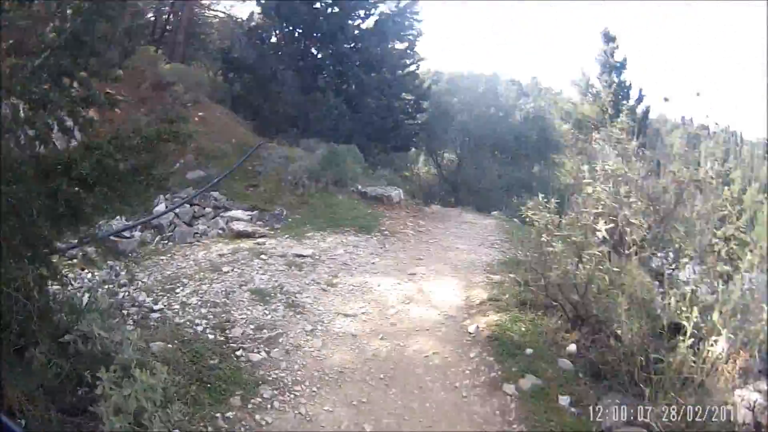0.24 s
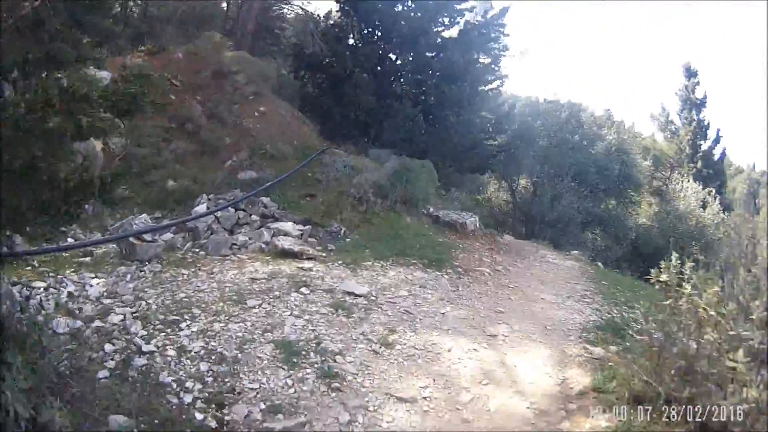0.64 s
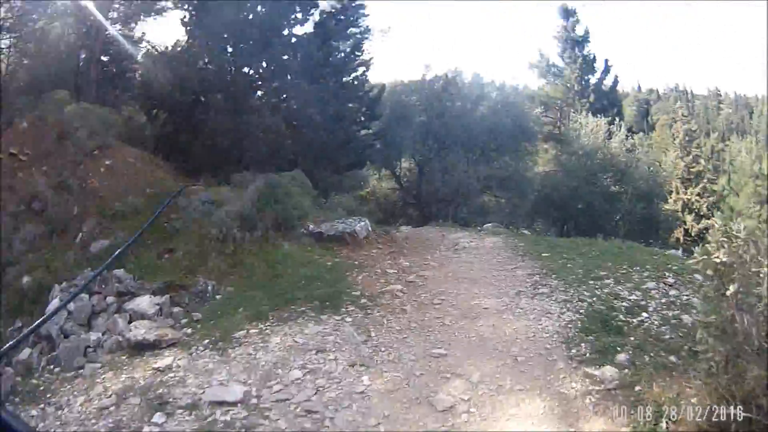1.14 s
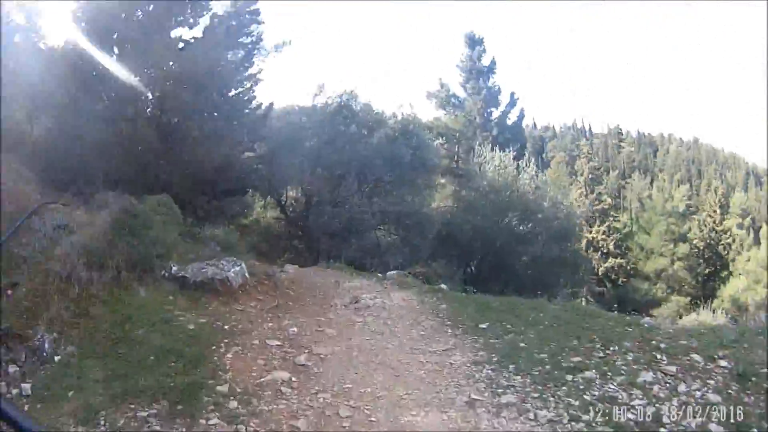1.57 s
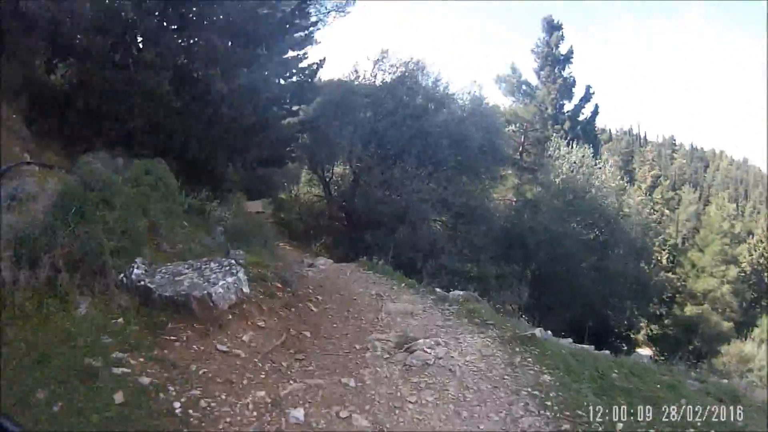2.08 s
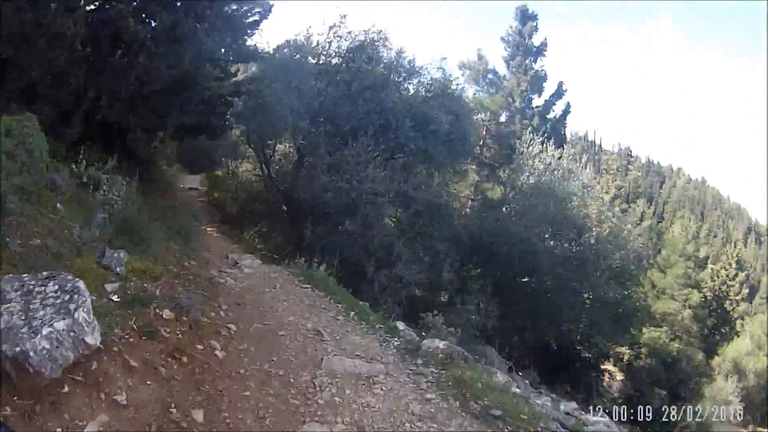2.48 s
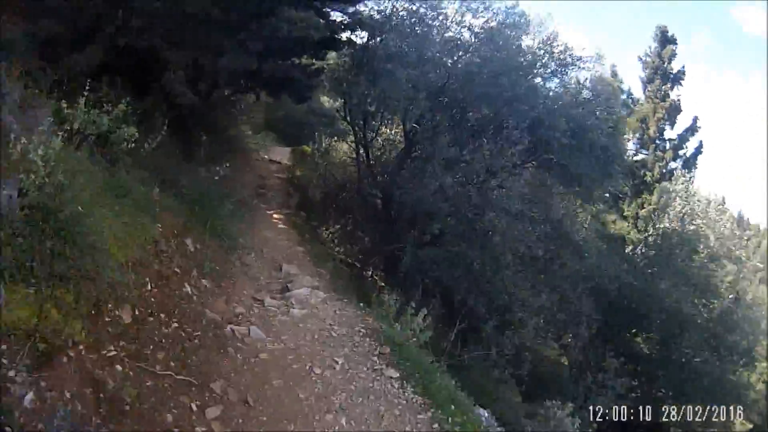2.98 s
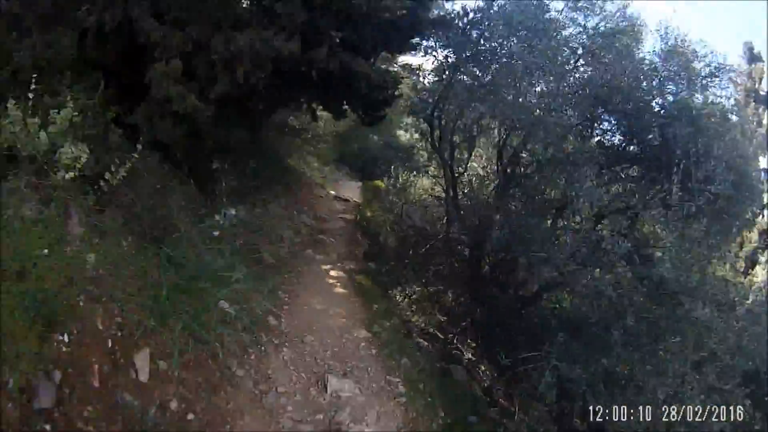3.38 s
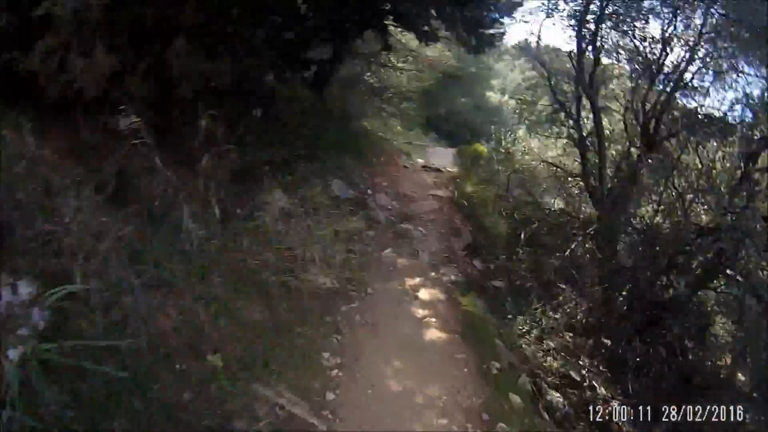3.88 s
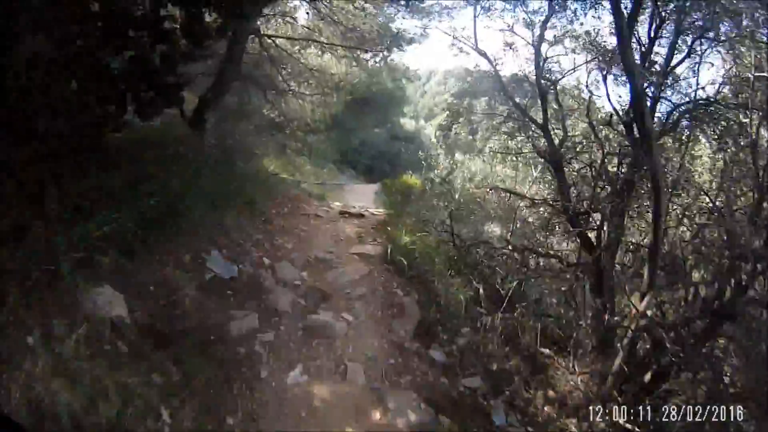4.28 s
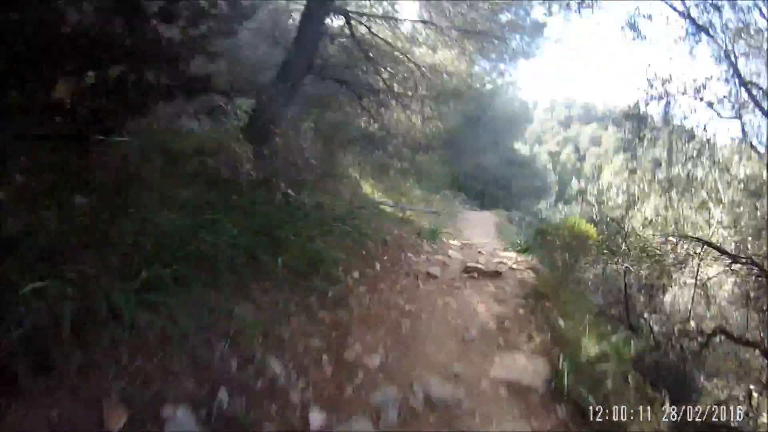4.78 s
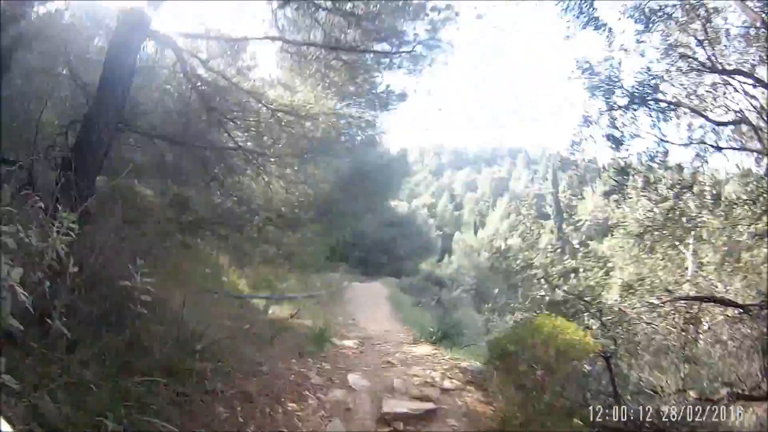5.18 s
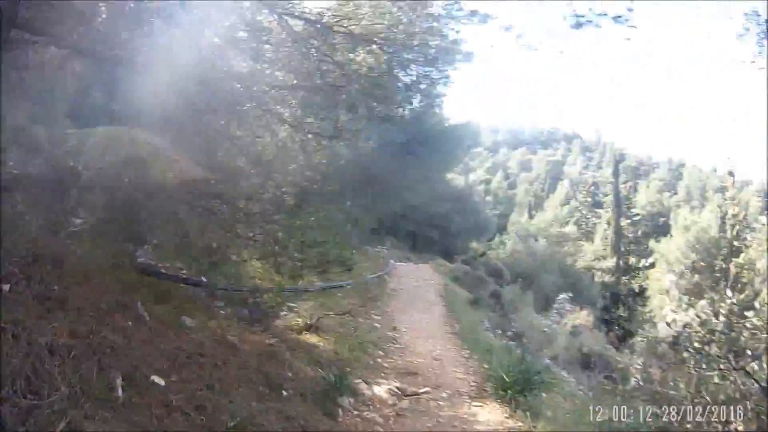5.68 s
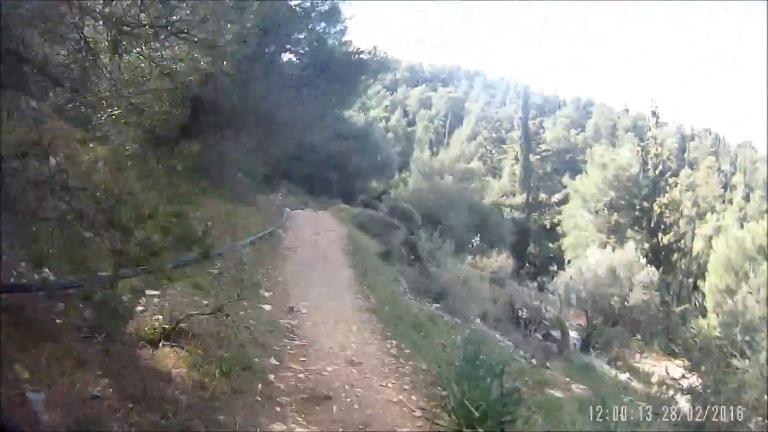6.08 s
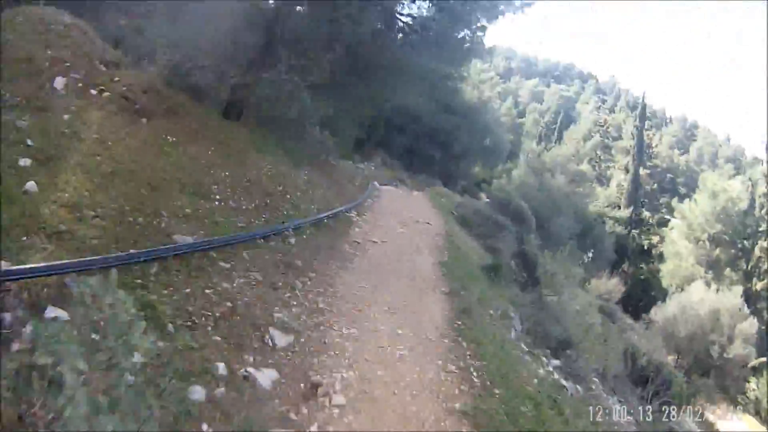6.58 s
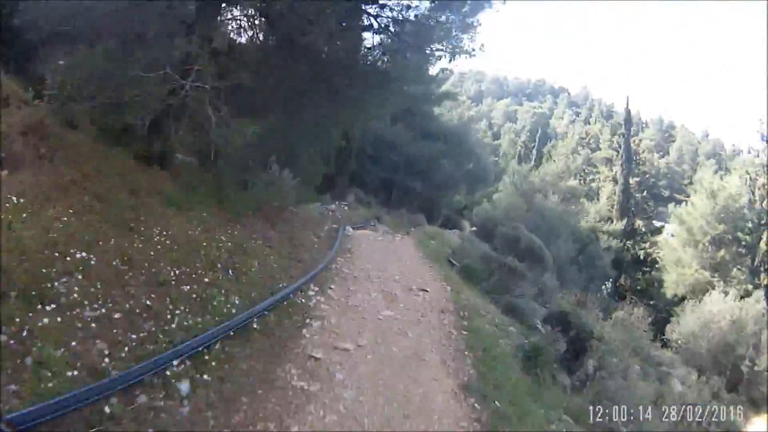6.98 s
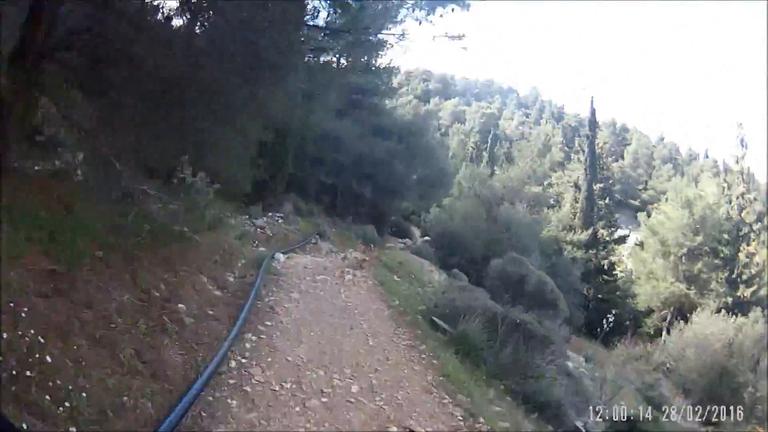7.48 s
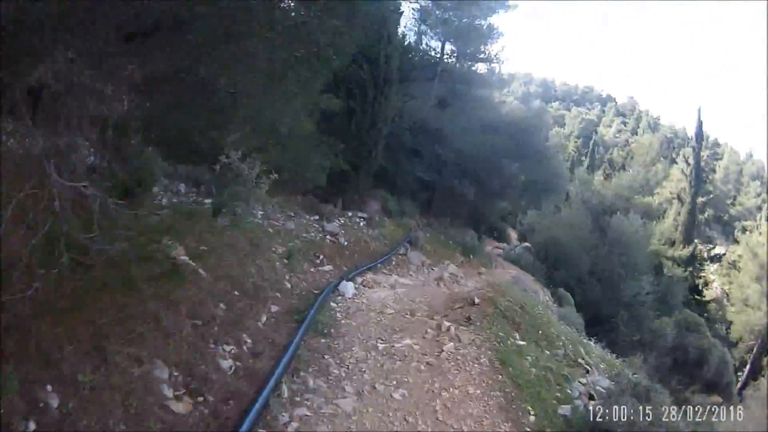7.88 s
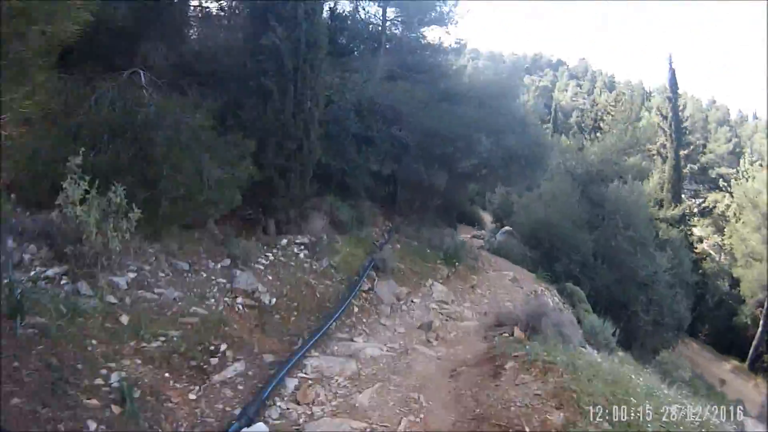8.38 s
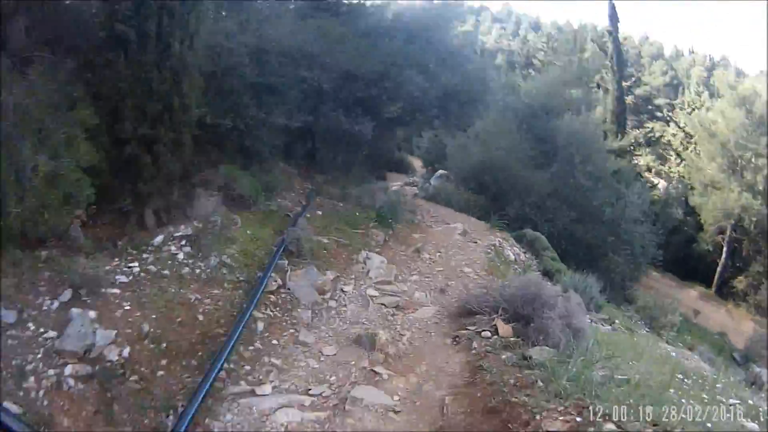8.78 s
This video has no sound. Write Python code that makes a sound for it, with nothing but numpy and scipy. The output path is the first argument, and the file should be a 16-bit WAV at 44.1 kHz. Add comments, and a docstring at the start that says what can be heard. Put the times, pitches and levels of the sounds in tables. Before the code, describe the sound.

Quiet rolling on smooth dirt turns into fast, irregular knocks and rattles as a bicycle hits stones, then a dull brake rub joins.

```python
"""Jolts of a mountain bike on a stony trail, heard from a small camera in a plastic case riding along.
Each stone gives a clack (broadband force on the case resonances) and a thump (damped swing of the mount),
followed by two rebounds; random small impacts make loose parts chatter in between.
Below lie coloured-noise tyre rumble, crunching grit, soft frame clunks and air noise.
Near the end the rub of the brakes, noise through sharp resonances, grows and a pad chirps once."""
import sys
import numpy as np
from scipy import signal
from scipy.fft import rfft, irfft
from scipy.io import wavfile
from scipy.ndimage import uniform_filter1d

SR = 44100
rng = np.random.default_rng(int(sys.argv[2]) if len(sys.argv) > 2 else 0)


def generate_wav(signal):
    """Clip the signal to [-1, 1] and save it as 16-bit WAV at the path in sys.argv[1]."""
    frames = np.transpose(np.atleast_2d(signal))
    scaled = np.clip(frames, -1, 1) * 32767
    pcm = np.round(scaled).astype(np.int16)
    wavfile.write(sys.argv[1], SR, pcm)


N = 434385
TIME = np.arange(N) / SR  # s

# Spectrum of rushing air and hiss: f/Hz, relative level/dB
AIR_SPECTRUM = [(200, -12.5), (500, -2), (1000, -4), (2000, -8.5), (4000, -13.5), (7000, -16), (10000, -19),
                (15000, -20)]
# Resonances of the rubbing brake: f/Hz, width/Hz, relative level/dB
BRAKE_MODES = [(985, 240, 2), (1500, 140, -4), (2880, 330, -19), (4640, 120, -8)]
# Brake rub along the ride, before flutter: t/s, level/dB
BRAKE_LEVELS = [(0, -93), (7.2, -78), (7.8, -73), (8.3, -55.5), (8.75, -53), (9.4, -56.5), (9.85, -58.5)]
# Spectrum of the tyre rumble: f/Hz, relative level/dB
RUMBLE_SPECTRUM = [(18, -2.5), (30, 1.5), (60, 7), (100, 3.5), (160, 4), (230, -6), (320, -12.5),
                   (500, -29.5), (1000, -38.5)]
# Ground under the tyres, before the layer offsets: t/s, rumble level/dB, grit level/dB
GROUND_LEVELS = [(0.0, -44, -67.5), (0.85, -40, -57.5), (1.62, -34, -55), (2.6, -31, -50),
                 (2.96, -30.5, -47.5), (3.59, -30.5, -49.5), (4.39, -34.5, -50.5), (4.61, -40.5, -52.5),
                 (4.83, -28.5, -54), (5.05, -29.5, -46), (5.43, -34.5, -51), (5.76, -31.5, -54.5),
                 (5.98, -38, -58), (6.45, -33, -54), (6.67, -29.5, -41.5), (6.8, -31, -48.5),
                 (7.05, -35, -54.5), (7.27, -34.5, -56.5), (7.57, -32, -55.5), (8.07, -31, -44),
                 (8.36, -32.5, -48.5), (8.78, -34.5, -53), (9.13, -32, -47.5), (9.85, -34, -50.5)]
# Smooth dirt at first, then stones: t/s, relative level/dB
STONY_LEVELS = [(0.7, -12.5), (1.5, -3), (2.8, -2)]
# Soft clunks of the frame: t/s, f/Hz, level/dB
FRAME_CLUNKS = [(0.1566, 277, -29.5), (0.1725, 282, -30), (0.184, 168, -37)]
# Main resonances of the case: f/Hz, width/Hz, relative level/dB
CASE_MODES = [(520, 217, 3), (877, 273, 6.5), (1380, 540, 5.5), (1825, 258, 9), (2787, 670, 4),
              (3150, 850, -9.5), (4204, 1600, 0), (4588, 510, 9)]
# Faint overtones of the case: f/Hz, width/Hz, relative level/dB
CASE_OVERTONES = [(6400, 2000, -18), (8840, 1850, -17), (11300, 720, -26)]
# Stones that jolt the bike, before the layer offsets: t/s, clack level/dB, thump level/dB,
# wait until the mount drops back/s, rebound level relative to the first blow/dB
STONE_JOLTS = [(0.1256, -44, -58, 0.034, -1.5), (0.9697, -45, -24.5, 0.021, -21),
               (1.195, -38.5, -20.5, 0.014, -21), (1.4075, -25, -14, 0.054, -32),
               (1.4803, -35, -22, 0.039, -20), (1.5611, -34.5, -21.5, 0.028, 2),
               (1.7615, -36, -18.5, 0.038, -4), (1.9472, -25, -8.5, 0.019, -6.5),
               (2.0147, -30.5, -15.5, 0.023, -1), (2.214, -42, -28.5, 0.02, -15),
               (2.2586, -38.5, -22, 0.05, -10), (2.3598, -32.5, -16, 0.015, -2),
               (2.4306, -34.5, -25, 0.017, -26), (2.698, -33.0, -18.5, 0.015, -15),
               (2.8103, -30, -12.5, 0.014, -33), (2.8546, -30.5, -14.0, 0.022, -1.5),
               (2.9356, -27.5, -9.5, 0.02, -18), (2.995, -35.5, -22, 0.0081, 2.0),
               (3.1011, -30.5, -12, 0.013, -14), (3.1484, -31, -15, 0.02, 4.5),
               (3.2742, -24, -12, 0.036, -3), (3.471, -33, -22, 0.035, 3), (3.5465, -37, -25, 0.042, 0),
               (3.6179, -29.5, -16, 0.026, 0.5), (3.66, -21, -10.0, 0.034, -10),
               (3.7681, -30.0, -23, 0.034, -12), (3.8152, -28, -17.5, 0.019, -1),
               (3.893, -26, -14, 0.013, -4), (3.948, -29, -14, 0.0054, -21),
               (3.9815, -22.5, -14, 0.0066, -15), (4.0832, -31.5, -17.5, 0.024, 1),
               (4.1223, -30.5, -13.5, 0.015, 4), (4.2205, -16, -3.5, 0.029, -3.5),
               (4.2655, -23, -8, 0.017, -1.5), (4.3497, -28.5, -14, 0.031, -6),
               (4.4424, -38, -18, 0.018, -1.0), (4.514, -30, -20, 0.014, 0.5),
               (4.5591, -31, -11, 0.017, -0.5), (4.8765, -27, -13.0, 0.021, 3.5),
               (5.0686, -22, -9.5, 0.032, -6), (5.1212, -26, -21, 0.05, 0), (5.1817, -23, -9.0, 0.018, 0.5),
               (5.2599, -28.5, -19, 0.013, -18), (5.4237, -30.5, -23, 0.035, -32),
               (5.467, -28, -22.5, 0.018, 5.5), (5.57, -25.5, -13, 0.017, 3),
               (5.6821, -33.5, -23, 0.017, -26), (5.9496, -37.5, -23.5, 0.026, 1.5),
               (6.1252, -25, -9, 0.019, -3.5), (6.1669, -27.5, -15, 0.011, -4),
               (6.4843, -35, -17.5, 0.032, 2), (6.557, -30, -34, 0.025, -9), (6.6073, -20, -8, 0.02, -5),
               (6.7021, -33.5, -25, 0.029, -12), (6.7571, -40.5, -20, 0.021, 2),
               (6.843, -26.5, -9.5, 0.082, -23), (6.8889, -22.5, -14, 0.01, -14),
               (6.9892, -27.5, -17, 0.01, 2), (7.1775, -35.5, -18.5, 0.0083, -26),
               (7.306, -36, -18.5, 0.036, 0.5), (7.438, -36.5, -30, 0.015, -25),
               (7.5432, -33, -16, 0.015, 1.5), (7.5852, -29.5, -11.5, 0.016, -3.5),
               (7.7281, -30.5, -17.5, 0.041, -12), (7.8293, -29, -15.5, 0.035, -1),
               (7.8816, -30, -14.5, 0.0089, 1), (8.0093, -30.5, -17, 0.041, -0.5),
               (8.1169, -27, -11, 0.016, -9), (8.171, -31, -19, 0.01, -3), (8.2747, -27.5, -12, 0.056, -18),
               (8.5545, -30, -15.5, 0.036, 0.5), (8.8664, -34.5, -16, 0.0089, -25),
               (8.926, -23, -11, 0.021, -3.5), (9.1062, -39, -14, 0.028, -3.5),
               (9.28, -22.5, -8.5, 0.025, 0.5), (9.3801, -33.5, -17.5, 0.036, -7),
               (9.4846, -41, -14.5, 0.025, -16), (9.816, -33.5, -24, 0.01, -19)]

AIR_DB = -61
WHINE_HZ, WHINE_DB = 10500, -76
CUTOFF_HZ = 15300
WALL_CUT_HZ = 5180  # upper limit of the main case modes; the overtones bypass it
MOUNT_HZ, MOUNT_RISE_S = 174.5, 0.0039
SMALL_CLACK_DB, SMALL_THUMP_DB, SMALL_SPREAD_DB = 11, 11, 1.5  # small stones, over grit and rumble
SETTLE_WAIT, SETTLE_DB = 0.6, -7.5  # last bounce: typical share of the first wait, level over the rebound
REBOUND_THUMP_DB = -1  # rebounds carry less weight


def from_db(db):
    """Level in decibels expressed as an amplitude ratio."""
    return 10 ** (np.asarray(db) / 20)


def rms_one(x):
    """Normalisation to unit root mean square."""
    return x / np.sqrt(np.mean(x ** 2) + 1e-20)


def in_time(rows):
    """Linear interpolation of each column to one value per sample."""
    s, *columns = np.transpose(rows)
    return [np.interp(TIME, s, column) for column in columns]


def add(out, s, sound):
    """Superposition of a short sound starting at time s."""
    i = int(np.clip(round(s * SR), 0, N - 1))
    out[i:i + len(sound)] += sound[:N - i]


def noise(spectrum):
    """Spectral shaping: white noise weighted in frequency, then set to rms 1."""
    hz, db = np.transpose(spectrum)
    log_f = np.log(np.fft.rfftfreq(N, 1 / SR) + 1)
    gain = from_db(np.interp(log_f, np.log(hz), db))
    gain = gain / (1 + (np.exp(log_f) / hz[-1] / 2) ** 4)  # roll-off above the last row
    return rms_one(irfft(rfft(rng.standard_normal(N)) * gain, N))


def drift(per_s):
    """Slow random modulation: Gaussian knots joined by straight lines, rms 1."""
    knots = rng.standard_normal(4096)
    return rms_one(np.interp(TIME * per_s, np.arange(len(knots)), knots))


def low_pass(x, hz):
    """First-order attenuation of the treble."""
    return signal.sosfilt(signal.butter(1, hz, fs=SR, output="sos"), x)


def resonate(x, hz, width_hz):
    """Resonance: a two-pole filter with a gain of about 1 at its peak."""
    r = np.exp(-np.pi * width_hz / SR)
    feedback = [1, -2 * r * np.cos(2 * np.pi * hz / SR), r * r]
    return signal.lfilter([(1 - r * r) / 2, 0, (r * r - 1) / 2], feedback, x + 1e-18)


def swell(t, before_s, after_s):
    """Exponential growth up to t = 0 and exponential decay after it."""
    return np.exp(np.minimum(t / before_s, -t / after_s))


def swing(hz, rise_s):
    """Damped oscillation: a few swings of a spring under an envelope of height 1."""
    t = np.arange(3000) / SR
    return np.sin(2 * np.pi * hz * t) * t / rise_s * np.exp(1 - t / rise_s)


def modes(force, table, uneven_db):
    """Modal superposition with alternating signs and a random gain for each mode and row of force."""
    gains = from_db(uneven_db * rng.standard_normal((len(table), *force.shape[:-1], 1)))
    total = 0
    for k, (hz, width_hz, db) in enumerate(table):
        total = total + (-1) ** k * from_db(db) * gains[k] * resonate(force, hz, width_hz)
    return total


def case(force, uneven_db=0):
    """Forced vibration of the case; different contact points favour different modes."""
    wall = signal.cheby1(8, 0.5, WALL_CUT_HZ, fs=SR, output="sos")
    main = signal.sosfilt(wall, modes(force, CASE_MODES, uneven_db))
    return main + modes(force, CASE_OVERTONES, uneven_db)


def contacts(per_s, spread_db):
    """Random point process: small impacts of either sign and uneven size."""
    born = rng.random(N) < per_s / SR
    size_db = spread_db * np.minimum(rng.exponential(1, N), 2.5)
    return born * from_db(size_db) * rng.choice([-1, 1], N)


def scrapes(hits, press_s, slip_s):
    """Rough friction: each impact is drawn out into a very short burst of noise."""
    t = np.arange(-400, 401) / SR
    power = signal.fftconvolve(hits ** 2, swell(t, press_s, slip_s) ** 2, "same")
    return np.sqrt(np.abs(power)) * rng.standard_normal(N)


def air():
    """Broadband flow noise and hiss of steady level."""
    return from_db(AIR_DB) * noise(AIR_SPECTRUM)


def brake_rub():
    """Friction excitation: noise stirs the resonances of the brake, rms 1."""
    total = 0
    for hz, width_hz, db in BRAKE_MODES:
        stirred = resonate(rng.standard_normal(N), hz, width_hz)
        total = total + from_db(db) * resonate(stirred, hz, 2 * width_hz)
    return rms_one(total)


def squeak(s, hz, width_hz, db, length_s):
    """Stick-slip chirp of a pad: narrow-band noise under a Gaussian envelope."""
    tone = resonate(resonate(rng.standard_normal(N), hz, width_hz), hz, width_hz)
    return from_db(db) * np.exp(-((TIME - s) / length_s) ** 2) * rms_one(tone)


def braking():
    """Sum of the fluttering rub and one brief chirp."""
    brake_db, = in_time(BRAKE_LEVELS)
    flutter_db = 2.1 * drift(25)
    rub = from_db(brake_db + flutter_db) * brake_rub()
    return rub + squeak(s=9.475, hz=917, width_hz=90, db=-44, length_s=0.016)


def shaking(blows, before_s, after_s):
    """Addition of power: shaking builds as a wheel climbs a stone and fades after the jolt."""
    t = np.arange(-3000, 6000) / SR
    power = np.zeros(N)
    for s, clack_db, _ in blows:
        add(power, s + t[0], (from_db(clack_db) * swell(t, before_s, after_s)) ** 2)
    return np.sqrt(power)


def tyre_rumble(rumble_db, jolts):
    """Low random vibration of rolling, strengthened as each jolt sets the whole bike swaying."""
    lumps_db = 1.8 * drift(30)
    sway = from_db(-5.5) * shaking(jolts, before_s=0.0087, after_s=0.051)
    return np.hypot(from_db(rumble_db + 0.26 + lumps_db), sway) * noise(RUMBLE_SPECTRUM)


def crunch(per_s, spread_db, dull_hz):
    """Impulse noise of fine grit crushed in clumps under the tyres, rms 1."""
    clumped_per_s = per_s * from_db(6.8 * drift(70))
    return rms_one(low_pass(case(contacts(clumped_per_s, spread_db)), dull_hz))


def chatter(per_s, spread_db, soft_db, bounce_db):
    """Impact excitation: hard contacts tick through the case, soft ones scuff it; both nudge the mount."""
    hard, soft = contacts(per_s, spread_db), contacts(per_s, spread_db)
    scuffs = from_db(soft_db) * low_pass(scrapes(soft, press_s=0.00058, slip_s=0.0036), hz=1080)
    ticks = rms_one(case(scrapes(hard, press_s=0.00061, slip_s=0.00048) + scuffs))
    bounce = resonate(resonate(hard + soft, hz=203, width_hz=158), hz=215, width_hz=265)
    return ticks + from_db(bounce_db) * rms_one(bounce)


def clunks(rise_s):
    """Damped oscillation of the frame as it takes up its play."""
    out = np.zeros(N)
    for s, hz, db in FRAME_CLUNKS:
        add(out, s, from_db(db) * swing(hz, rise_s))
    return out


def small_stones(count):
    """Scattered impacts, harder where the ground is rough: t/s, clack level/dB, thump level/dB."""
    s = (np.arange(count) + rng.random(count)) * TIME[-1] / count
    ground_s, rumble_db, grit_db = np.transpose(GROUND_LEVELS)
    size_db = np.interp(s, *np.transpose(STONY_LEVELS)) + SMALL_SPREAD_DB * rng.standard_normal(count)
    clack_db = np.interp(s, ground_s, grit_db) + SMALL_CLACK_DB + size_db
    thump_db = np.interp(s, ground_s, rumble_db) + SMALL_THUMP_DB + size_db
    return np.column_stack([s, clack_db, thump_db])


def rebounds(jitter):
    """Repeated impact of a loose mount thrown up by a stone: t/s, clack level/dB, thump level/dB."""
    blows = []
    chances = rng.standard_normal(len(STONE_JOLTS))
    for (s, clack_db, thump_db, wait_s, rebound_db), late in zip(STONE_JOLTS, chances):
        last_s = wait_s * (1 + SETTLE_WAIT * np.exp(jitter * late))
        blows.append((s, clack_db, thump_db))
        for after_s, db in (wait_s, rebound_db), (last_s, rebound_db + SETTLE_DB):
            blows.append((s + after_s, clack_db + db, thump_db + db + REBOUND_THUMP_DB))
    return np.array(blows)


def thumps(blows, pitch_spread, lead_s, rock_hz, rock_db, rock_rise_s):
    """Damped oscillation of the mount: a bounce of varying pitch and a brief, higher rocking."""
    out = np.zeros(N)
    for (s, _, thump_db), chance in zip(blows, rng.standard_normal((len(blows), 3))):
        bounce = swing(MOUNT_HZ * np.exp(pitch_spread * chance[0]), MOUNT_RISE_S)
        rock = swing(rock_hz * np.exp(pitch_spread * chance[2]), rock_rise_s)
        rock = from_db(rock_db) * chance[1] * rock
        add(out, s - lead_s, from_db(thump_db) * (bounce + rock))
    return out


def clacks(blows, press_s, contact_s, crack_db, grind_s, settle_s, settle_db, dull_hz, thin_hz, looseness):
    """Friction and impact: the case grinds in its holder under load, slips with a crack, buzzes as it settles."""
    t = np.arange(-600, 1500) / SR
    shape = (len(blows), len(t))
    crack = from_db(crack_db) * (t == 0)
    contact = rng.standard_normal(shape) * swell(t, press_s, contact_s) + crack
    contact = contact - low_pass(contact, thin_hz)  # a small hard contact carries little bass
    ground_s, _, grit_db = np.transpose(GROUND_LEVELS)
    # smooth dirt gives clean single clacks
    rough_db = np.interp(blows[:, :1], ground_s, grit_db - grit_db.mean())
    buzz_gain = from_db(settle_db + looseness * rough_db)
    buzz = rng.standard_normal(shape) * buzz_gain * swell(t, grind_s, settle_s)
    sounds = case(contact + low_pass(buzz, dull_hz), uneven_db=1.8)
    # the clack level is the greatest rms over 66 samples (1.5 ms)
    peaks = np.sqrt(uniform_filter1d(sounds ** 2, size=66, axis=1).max(axis=1))
    out = np.zeros(N)
    for (s, clack_db, _), sound, peak in zip(blows, sounds, peaks):
        add(out, s + t[0], from_db(clack_db) * sound / peak)
    return out


def scene():
    """Linear superposition of air, brakes, rolling tyres, chatter and jolts."""
    rumble_db, grit_db = in_time(GROUND_LEVELS)
    stony_db, = in_time(STONY_LEVELS)
    jolts = rebounds(jitter=0.27)
    blows = np.vstack([jolts, small_stones(count=70)])

    rumble = tyre_rumble(rumble_db, jolts)
    rolling = from_db(grit_db + stony_db)
    grit = from_db(-6) * rolling * crunch(per_s=1200, spread_db=8.5, dull_hz=890)
    shake = from_db(stony_db) * shaking(jolts, before_s=0.0084, after_s=0.025)
    rattle = from_db(-13) * shake * chatter(per_s=130, spread_db=4.0, soft_db=-5.0, bounce_db=6.5)
    pebbles = from_db(1.0) * rolling * chatter(per_s=48, spread_db=6.5, soft_db=1.5, bounce_db=10.0)

    mount = from_db(-2) * thumps(blows, pitch_spread=0.16, lead_s=0.00081,
                                 rock_hz=304, rock_db=-16, rock_rise_s=0.0043)
    case_clacks = clacks(blows, press_s=0.00093, contact_s=0.0015, crack_db=12.0,
                         grind_s=0.0032, settle_s=0.01, settle_db=-12.5,
                         dull_hz=1330, thin_hz=800, looseness=0.4)
    knocks = case_clacks + mount + clunks(rise_s=0.004)
    return (air() + braking() + rumble + grit + rattle + pebbles + knocks)[None]


def record(dry):
    """Band limitation: the camera adds a faint electronic whine and cuts the top."""
    whine = from_db(WHINE_DB) * np.sqrt(2) * np.sin(2 * np.pi * WHINE_HZ * TIME)  # level is rms
    top_cut = signal.ellip(10, 0.2, 80, CUTOFF_HZ, fs=SR, output="sos")
    return signal.sosfilt(top_cut, dry + whine)


dry = scene()
out = record(dry)
generate_wav(out)
```